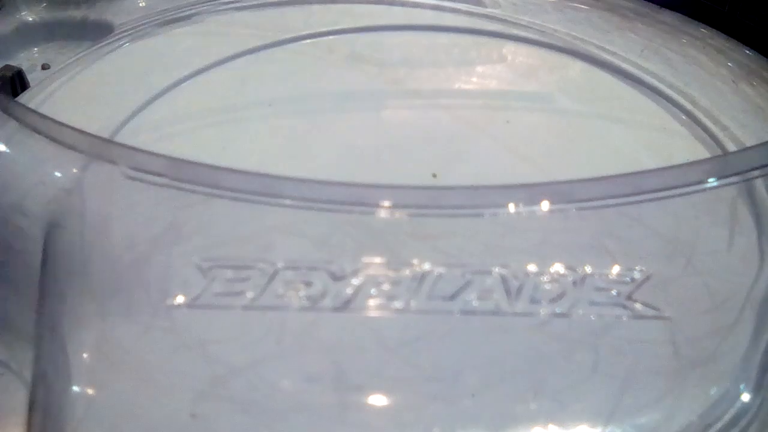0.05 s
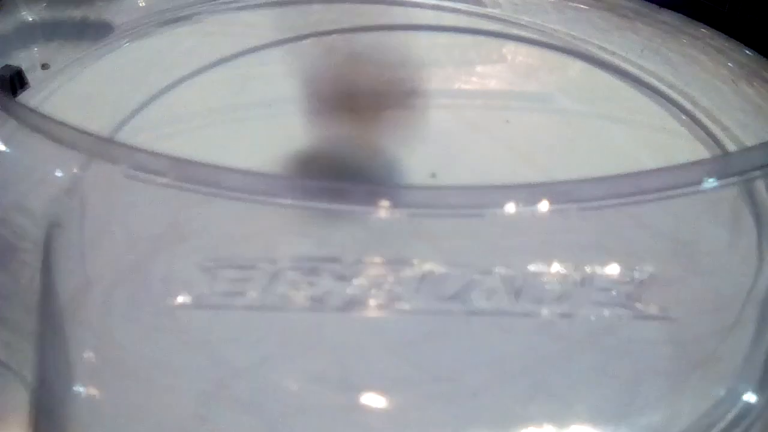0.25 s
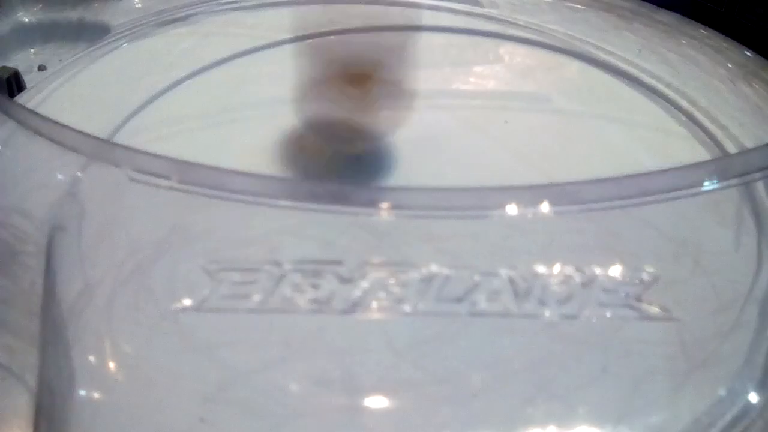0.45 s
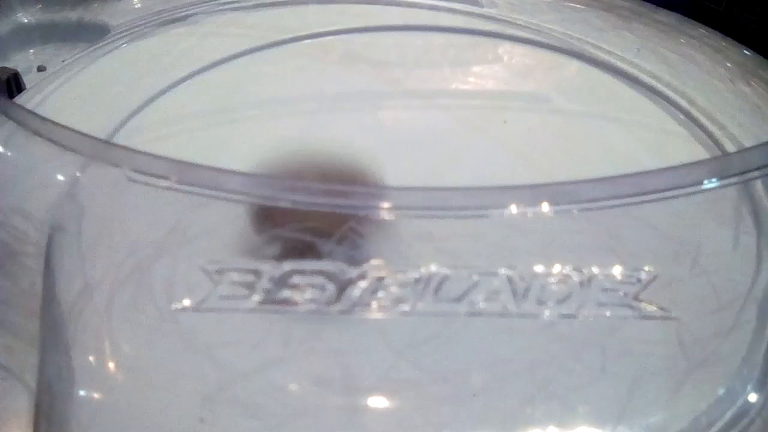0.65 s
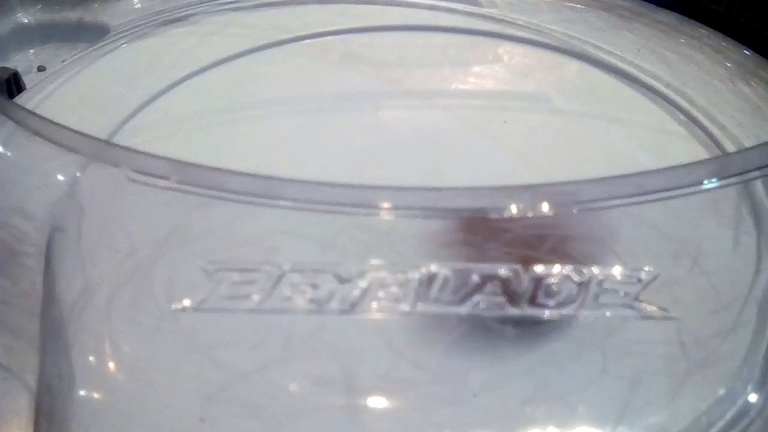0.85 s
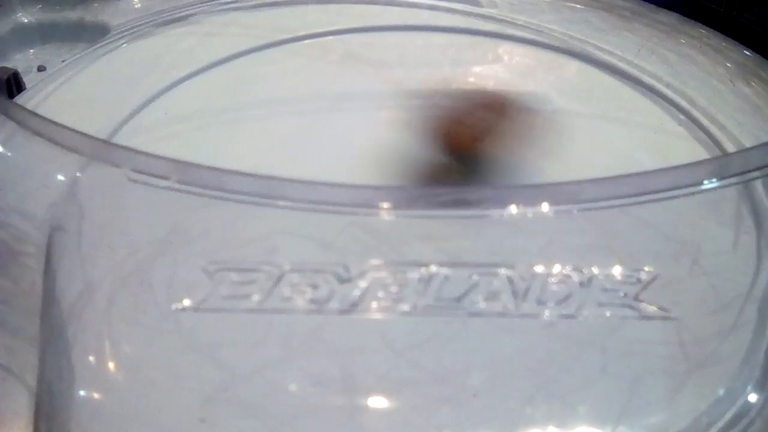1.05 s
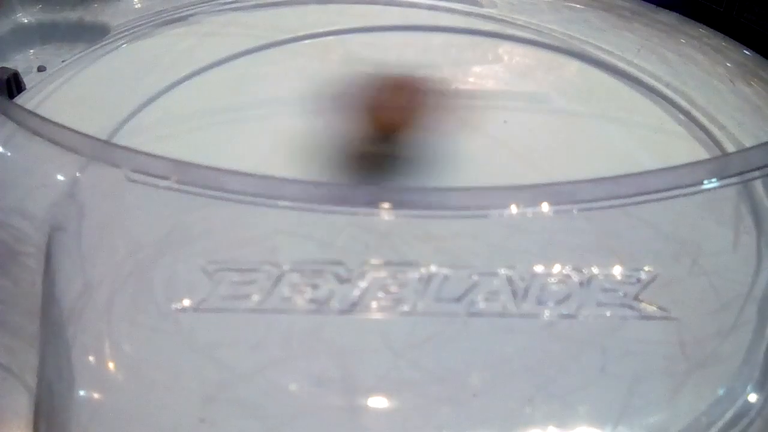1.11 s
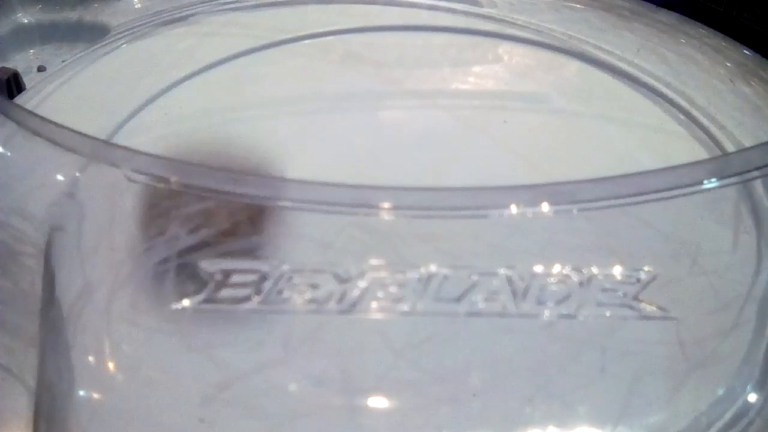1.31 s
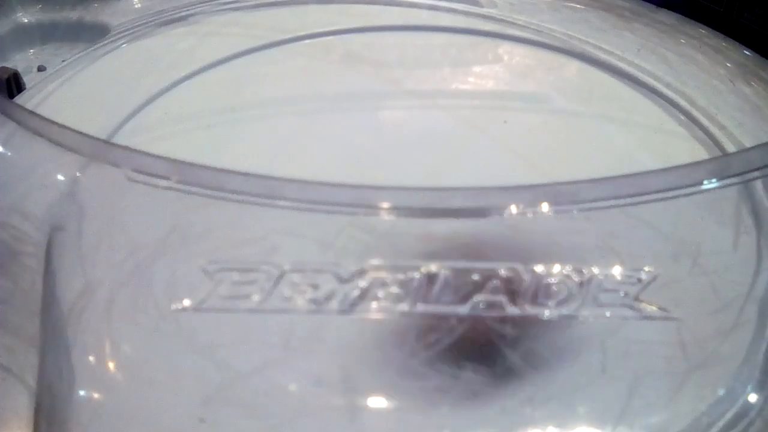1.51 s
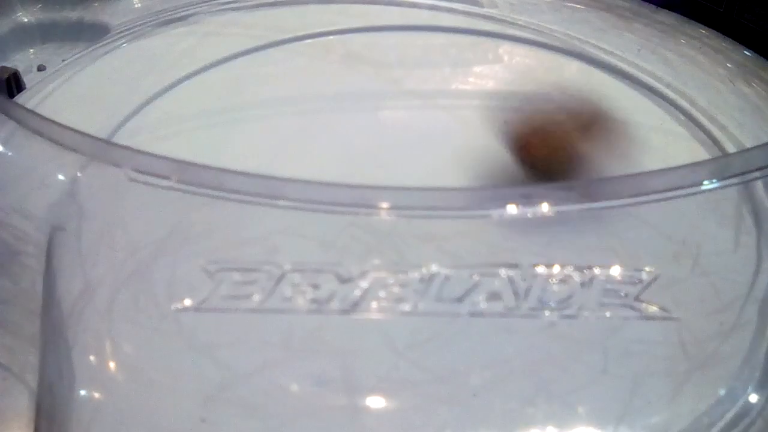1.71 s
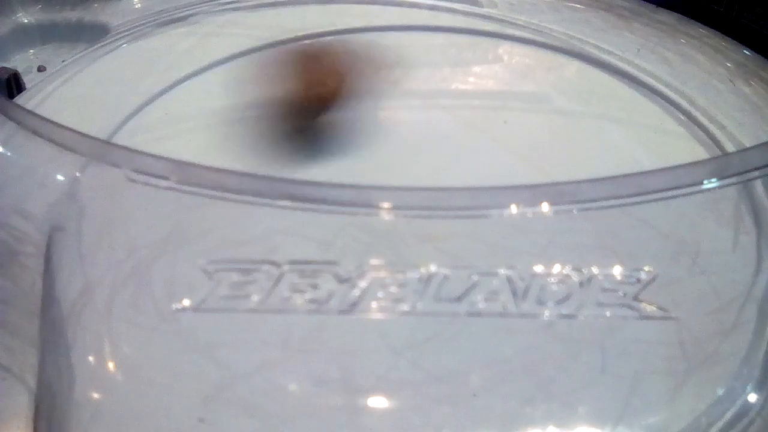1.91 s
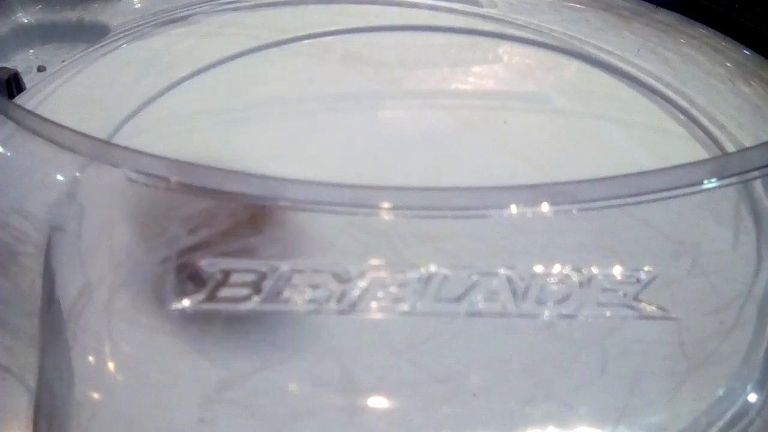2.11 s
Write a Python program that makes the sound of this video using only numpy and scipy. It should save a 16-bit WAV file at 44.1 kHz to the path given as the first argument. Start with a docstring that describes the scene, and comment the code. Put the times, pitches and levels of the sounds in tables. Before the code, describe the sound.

A toy spinning top is launched with a quick ratcheting zip at about 0.2 seconds. It lands in a plastic bowl with hollow thuds and ticks from 0.4 to 0.8 seconds. Then it circles with a low whir and faint rattle until the end, just past 2 seconds. Its rim clacks sharply against the wall around 0.9 seconds and rapidly from 1.3 to 1.7, close by in a small room.

```python
"""Spinning top in a plastic arena

A toy top is ripped from a ratchet launcher and drops into a thin plastic bowl in a small room.
It bounces and makes the floor boom, then circles: its uneven weight hums, its tip rumbles,
its loose parts tick once a turn, and its rim clacks against the wall."""
import sys
import numpy as np
from scipy import signal
from scipy.fft import rfft, irfft
from scipy.io import wavfile
from scipy.ndimage import uniform_filter1d

SR = 44100
rng = np.random.default_rng(int(sys.argv[2]) if len(sys.argv) > 2 else 0)


def put_to_file(sound):
    """Save the sound as 16-bit audio at rate SR, in the file named by the first command-line argument."""
    columns = np.atleast_2d(sound).T  # one column per channel
    safe = np.clip(columns, -1, 1)
    whole_steps = np.round(safe * 32767)
    wavfile.write(sys.argv[1], SR, whole_steps.astype(np.int16))


N = 94815
T = np.arange(N) / SR

# A "colour" says how strong each frequency is. A "tilt" makes a sound brighter (+) or duller (-).
# colour of the still air: (frequency [Hz], level [dB])
AIR_COLOUR = [(30, -6), (140, -4), (400, -14), (2000, -19), (16000, -19)]
# launcher teeth snapping past the catch: (time [s], level [dB], treble tilt [dB per octave])
TOOTH_SNAPS = [(0.1421, -36.5, 3.5), (0.1702, -35, 1.5), (.1840, -48, -2), (0.2004, -1.5, 2.5),
               (0.2136, -1.5, 2.5), (0.2267, -5.5, 3.5), (0.2356, -11, -2), (0.241, 3.5, 2),
               (0.2463, -8, 8.5), (0.2542, -7.5, -0.5), (.2620, -3, 8), (0.2705, -6.5, 1)]
# colour of the launcher: (frequency [Hz], level [dB])
LAUNCHER_COLOUR = [(40, -13.5), (150, -15.5), (500, -27), (1100, -21), (2000, -18), (2500, -7), (3300, -16),
                   (4100, -6.5), (4850, 1), (5600, -5.5), (7500, -9.5), (11000, -22.5), (16000, -41)]
# ringing tones of the launcher's shell: (frequency [Hz], level [dB], time to fade 60 dB [s])
SHELL_TONES = [(2425, -22.5, 0.084), (2770, -24, 0.087), (4160, -11, 0.021), (4880, -5.5, 0.02),
               (4807, -17, 0.025), (5440, -21, 0.018), (5370, -28, 0.019), (6160, -24, .045),
               (7600, -24, 0.11)]
# echo of the room: (frequency [Hz], level [dB], time to fade 60 dB [s])
ROOM_ECHO = [(60, -43, 0.38), (382, -23.5, 0.75), (1010, -17.5, 0.39), (2440, -6.5, 0.54),
             (4950, -19, 0.44), (7900, -13, 0.51), (12400, -15.5, 0.37), (16100, -23, 0.23)]
# the top hits the floor:
# (time [s], thud level [dB], tilt of the floor tones [dB per octave], tick level [dB], tip ring [Hz])
BOUNCES = [(0.4239, 1, 1, 2, 1820), (.4490, -7, 4, -7, 2350), (.474, -40, 9, -16, 2000),
           (.505, -14, 1.5, -19.5, 2000), (.6380, -4.5, -2.5, -6, 3640), (.644, -8, 1.5, -5.5, 5000),
           (.660, -20.5, 8, -14, 3530), (.7330, -29, -9.5, -18, 3500), (0.7409, -19, 8, -15.5, 3630),
           (.7737, -27, -1, -21, 4630)]
# ringing tones of the arena floor: (frequency [Hz], level [dB], time to fade 60 dB [s])
FLOOR_TONES = [(98.2, -24.5, 0.26), (147.2, -23, 0.14), (179, -32, .2), (294.5, -15.5, 0.21),
               (349.6, -14.5, 0.16), (389.3, -16.5, 0.2), (437.7, -24.5, 0.28), (550.4, -22.5, 0.13),
               (588.5, -17, 0.16), (698, -22.5, 0.18), (782, -22, 0.15), (939, -31.5, 0.15),
               (1130, -34, .12)]
# colour of the floor's many other, crowded tones: (frequency [Hz], level [dB])
FLOOR_COLOUR = [(30, -23), (70, -15), (140, -5.5), (350, 0.5), (490, -4.5), (620, 1), (1000, -9.5),
                (1350, -18), (1800, -25.5), (2600, -36), (6000, -47)]
# colour of the tip's tick: (frequency [Hz], level [dB])
TIP_COLOUR = [(200, -38), (1000, 8), (1800, 2), (2700, -4), (4700, 2.5), (7000, -2), (10000, -16),
              (16000, -29)]
# the top slows down: (time [s], speed [turns per second])
SPIN_SPEED = [(.45, 93), (1.03, 86), (1.23, 83.5), (1.55, 80.3), (1.8, 77.3), (1.97, 76.4), (2.15, 74.2)]
# hum of the uneven weight: (time [s], tone at spin speed [dB], tone at twice that [dB], wobble [dB])
HUM_LEVELS = [(.45, -58, -71, -59.5), (.88, -63, -57, -62.5), (1.03, -46.5, -56.5, -67),
              (1.2, -52, -51, -75), (1.45, -62, -48.5, -53), (1.65, -49.5, -53, -61.5),
              (1.82, -54.5, -54.5, -61), (1.98, -52.5, -53.5, -68), (2.15, -64, -54, -52)]
# extra tones of the wobble: (frequency [times the spin speed], level added to the wobble level [dB])
WOBBLE_TONES = [(1.5, 4.5), (2.5, 2.5), (3.5, 0.5), (4, -1.5), (4.5, 3), (5.5, 0), (8, -30)]
# how hard the tip grinds: (time [s], level [dB])
ROLL_LEVELS = [(.42, -103), (.5, -55.5), (.8, -43.5), (.9, -49.5), (1.12, -51.5), (1.3, -47.5), (1.49, -44),
               (1.6, -46), (1.8, -48.5), (1.98, -47), (2.06, -43.5), (2.15, -46.5)]
# colour of the rolling tip: (frequency [Hz], level [dB])
ROLL_COLOUR = [(25, -13), (55, -30), (100, 3), (170, -4), (230, -6), (350, -1), (490, -2.5), (590, -1.5),
               (800, -5.5), (1200, -7.5), (1700, -17), (3000, -24.5), (8000, -25), (16000, -72)]
# how much the loose parts rattle: (time [s], level [dB])
RATTLE_LEVELS = [(.45, -81), (.8, -65), (1.0, -45.5), (1.15, -49.5), (1.25, -47.5), (1.5, -50), (1.7, -47),
                 (1.86, -46.5), (1.92, -43.5), (2.05, -45), (2.15, -53.5)]
# colour of the rattle: (frequency [Hz], level [dB])
RATTLE_COLOUR = [(300, -15), (1500, -11), (2700, -17), (3700, -9), (4300, -2), (4800, -3), (5500, -9),
                 (7000, -9.5), (9000, -18), (12000, -27.5), (16000, -40)]
# ringing tones of the loose parts: (frequency [Hz], level [dB])
RATTLE_TONES = [(3750, -8), (4300, -23), (4880, -1)]
# the ticks limp, every second one stronger: (time [s], level of even turns over odd turns [dB])
TICK_LIMP = [(1.0, 14), (1.25, 8), (1.75, -6), (1.85, -8.5), (1.9, 3), (2.06, 8.5), (2.1, -18)]
# the rim hits the wall: (time [s], level [dB], low ring [Hz], its relative level [dB], high ring [Hz],
# its relative level [dB], treble tilt [dB per octave], time for the crack to fade 60 dB [s])
RIM_HITS = [(0.7167, -28.5, 3420, -30, 4770, -12, 2, 0.011), (0.8042, -18, 3600, -28, 6700, -20, 1.5, 0.03),
            (.844, -26.5, 3500, -30, 6770, -18, 1, 0.1), (0.86, -25.5, 3466, -25, 6460, -12, -2.5, 0.031),
            (.9190, 0, 3600, -15.5, 4630, -13, 0.5, 0.045),
            (1.0364, -11, 3620, -17.5, 4680, -20, -3, 0.048),
            (1.075, -15, 3800, -35, 4560, -12.5, -3.5, 0.13), (1.323, -1, 3284, -11, 8100, -12.5, 3, 0.025),
            (1.387, -2.5, 3365, -11.5, 7500, -13, 2.5, 0.021),
            (1.4482, -2.5, 2440, -15, 4840, -25, 1, 0.024), (1.5143, -4, 2480, -17, 4240, -15.5, 0, 0.018),
            (1.5625, -6, 2440, -19.5, 4000, -8.5, 0, 0.02),
            (1.6246, -3.5, 2600, -15, 3650, -14.5, 0, 0.019),
            (1.6884, -4, 2560, -10, 3840, -10.5, -3, 0.022)]
# colour of a hit on the wall: (frequency [Hz], level [dB])
WALL_COLOUR = [(100, -17), (1100, -36), (1800, -7.5), (2200, -3.5), (3000, -1), (4500, 0.5), (5600, 0),
               (7000, 0.5), (9000, -5.5), (10500, -18.5), (13000, -17.5), (16000, -25)]


def from_db(db):
    """Turn decibels into a number to multiply a sound by."""
    return 10 ** (np.asarray(db) / 20)


def over_time(table):
    """Join a table's rows with straight lines: one curve for each column after the time."""
    times, *columns = np.transpose(table)
    return [np.interp(T, times, column) for column in columns]


def at_hz(table, hz, column=1):
    """Look up a table at any frequency, giving every octave the same width."""
    rows = np.array(table)
    return np.interp(np.log(hz), np.log(rows[:, 0]), rows[:, column])


def add(out, start_s, sound):
    """Mix a sound in at its start time."""
    start = int(start_s * SR)
    out[start:] += sound[:N - start]


def noise(colour):
    """Steady noise of a given colour, with an average strength (rms) of 1."""
    hz = np.maximum(np.fft.rfftfreq(N, 1 / SR), 1)
    shaped = irfft(rfft(rng.standard_normal(N)) * from_db(at_hz(colour, hz)), N)
    return shaped / shaped.std()


def drift(per_second):
    """A curve that wanders at random, mostly between -1 and 1."""
    points = rng.standard_normal(400)
    return np.interp(T * per_second, np.arange(len(points)), points)


def burst(colour, fade_s, tilt_db=0):
    """Many close tones struck at once: noise that fades 60 dB in fade_s, with a total energy of 1."""
    size = 2 ** 15
    hz = np.maximum(np.fft.rfftfreq(size, 1 / SR), 1)
    fade = from_db(-60 * np.minimum(T[:size] / fade_s, 4))
    spectrum = rfft(rng.standard_normal(size) * fade)
    # even out the noise's chance humps, then colour it and tilt it above 2000 Hz
    humps = uniform_filter1d(np.abs(spectrum) ** 2, int(14 / fade_s * size / SR) + 1)
    gain = from_db(at_hz(colour, hz) + tilt_db * np.log2(np.maximum(hz, 2000))) / np.sqrt(humps)
    # this form of the filter lets nothing sound before the hit
    sharp_filter = np.exp(rfft(2 * irfft(np.log(gain))[:size // 2], size))
    hit = irfft(spectrum * sharp_filter)
    return np.pad(hit / np.sqrt(np.sum(hit ** 2)), (0, N - size))


def ring(hz, db, fade_s):
    """One struck tone that fades 60 dB in fade_s."""
    return from_db(db - 60 * np.minimum(T / fade_s, 4)) * np.sin(2 * np.pi * hz * T)


def strike(tones, spread_db):
    """A struck object rings with all its tones, each a little louder or softer at every blow."""
    return sum((-1) ** k * ring(hz, db + spread_db * rng.standard_normal(), fade_s)
               for k, (hz, db, fade_s) in enumerate(tones))


def still_air(level_db=-82):
    """The air in the room makes a very faint, steady rush."""
    return from_db(level_db) * noise(AIR_COLOUR)


def launcher(slide_s=(0.16, 0.2), slide_db=(-53.5, -27), snap_boost_db=18.5):
    """The cord slides and its teeth snap through the ratchet; each snap makes the shell ring."""
    sliding = (T > slide_s[0]) * (T < slide_s[1])
    cord = noise(LAUNCHER_COLOUR) * from_db(np.interp(T, slide_s, slide_db)) * sliding
    shell = np.zeros(N)
    for time, db, tilt_db in TOOTH_SNAPS:
        snap = burst(LAUNCHER_COLOUR, fade_s=0.027, tilt_db=tilt_db)
        add(cord, time, from_db(db + snap_boost_db) * snap)
        add(shell, time, from_db(db) * strike(SHELL_TONES, spread_db=4.5))
    return cord, shell


def room_echo(sound, delay_s=0.003, build_s=0.0067):
    """The room throws sound back as a smooth tail that fades at its own rate in each frequency band."""
    tail = np.zeros(N)
    edges_hz = np.geomspace(40, 18000, 10)
    onset = 1 - np.exp(-np.maximum(T - delay_s, 0) / build_s)
    for low, high in zip(edges_hz, edges_hz[1:]):
        hz = np.sqrt(low * high)
        band_filter = signal.butter(2, [low, high], "band", fs=SR, output="sos")
        band = signal.sosfilt(band_filter, rng.standard_normal(N))
        fade = onset * from_db(-60 * T / at_hz(ROOM_ECHO, hz, column=2))
        tail += from_db(at_hz(ROOM_ECHO, hz)) * band * fade / np.sqrt(np.sum(fade ** 2))
    return signal.fftconvolve(sound, tail)[:N]


def bounces(middle_hz=400, boom_boost_db=15, tick_boost_db=6.5):
    """The tip ticks on the floor and the thin bowl booms, brighter or duller with the spot it hits."""
    out = np.zeros(N)
    for time, thud_db, tilt_db, tick_db, tip_hz in BOUNCES:
        tones = [(hz, db + tilt_db * np.log2(hz / middle_hz), fade_s) for hz, db, fade_s in FLOOR_TONES]
        floor_ring = strike(tones, spread_db=0.5)
        boom = from_db(boom_boost_db) * burst(FLOOR_COLOUR, fade_s=0.16)
        tick = from_db(tick_db + tick_boost_db) * burst(TIP_COLOUR, fade_s=0.061)
        tip_ring = ring(tip_hz, tick_db - 19.5, fade_s=0.029)
        add(out, time, from_db(thud_db) * (floor_ring + boom) + tick + tip_ring)
    return out


def hum(turns, waver_db=2.0):
    """The top's uneven weight rocks the floor, making tones at multiples of the spin speed."""
    first_db, second_db, wobble_db = over_time(HUM_LEVELS)
    tones = [(1, first_db), (2, second_db)]
    for multiple, db in WOBBLE_TONES:
        tones.append((multiple, wobble_db + db + waver_db * drift(per_second=7.22)))
    return np.sqrt(2) * sum(from_db(db) * np.sin(2 * np.pi * (multiple * turns + rng.random()))
                            for multiple, db in tones)


def rolling(turns, throb_depth=0.081, lap_s=0.677, nearest_s=1.517, echo_gain=0.37):
    """The tip grinds round the bowl; its echo off the wall sweeps the colour once a lap."""
    level_db, = over_time(ROLL_LEVELS)
    throb = 1 + throb_depth * np.cos(2 * np.pi * turns)
    grind = from_db(level_db) * noise(ROLL_COLOUR) * throb
    # the echo comes latest when the top passes closest to the listener
    delay_s = 0.003286 + 0.00016 * np.cos(2 * np.pi * (T - nearest_s) / lap_s)
    wall_echo = echo_gain * np.interp(T - delay_s, T, grind)
    return (grind + wall_echo) / np.hypot(1, echo_gain)


def rattle(turns, speed, rise_s=0.0007, decay_s=0.0051, spread_db=1, steady_scuff=0.073):
    """Loose parts of the top tick once a turn: a short scuff and a ring, over a faint steady scuff."""
    level_db, = over_time(RATTLE_LEVELS)
    limp_db, = over_time(TICK_LIMP)
    turn = np.floor(turns).astype(int)
    since_tick_s = turns % 1 / speed
    strength = from_db(spread_db * rng.standard_normal(N)[turn] + limp_db * (0.5 - turn % 2))
    ticks = strength * np.exp(-since_tick_s / decay_s) * (1 - np.exp(-since_tick_s / rise_s))
    rings = sum(from_db(db) * np.sin(2 * np.pi * (hz * since_tick_s + rng.random(N)[turn]))
                for hz, db in RATTLE_TONES)
    scuff_shape = steady_scuff + ticks
    parts = noise(RATTLE_COLOUR) * scuff_shape + rings * ticks
    return from_db(level_db) * parts / np.sqrt(np.mean(scuff_shape ** 2))


def wall_ring(hz, db, fade_s, split=0.074, twin_db=-5):
    """A short, broad ring of the wall: one tone with a softer twin just above it."""
    return ring(hz, db, fade_s) - ring(hz * (1 + split), db + twin_db, fade_s)


def rim_clacks(crack_boost_db=5.5):
    """The rim hits the wall with a hard crack and a short ring whose pitch depends on the spot."""
    cracks, rings = np.zeros((2, N))
    for time, db, low_hz, low_db, high_hz, high_db, tilt_db, fade_s in RIM_HITS:
        add(cracks, time, from_db(db + crack_boost_db) * burst(WALL_COLOUR, fade_s, tilt_db))
        add(rings, time, wall_ring(low_hz, db + low_db, fade_s=0.022))
        add(rings, time, wall_ring(high_hz, db + high_db, fade_s=0.014))
    return cracks, rings


def scene(tick_at_s=1.171):
    """Launch, landing and spin, heard from beside the arena."""
    speed, = over_time(SPIN_SPEED)
    turns = np.cumsum(speed) / SR
    turns -= np.interp(tick_at_s, T, turns)   # a turn, and so a tick, starts at this moment
    landed = T > BOUNCES[0][0]
    cord, shell = launcher()
    cracks, wall_rings = rim_clacks()
    rings = shell + wall_rings
    clatter = bounces() + landed * rattle(turns, speed)
    # each sound reaches the room with its own strength; the whir stays free of room echo
    echo = room_echo(clatter + from_db(1) * cord + from_db(2) * cracks + from_db(-12.5) * rings)
    whir = landed * (hum(turns) + rolling(turns))
    return (cord + clatter + cracks + rings + whir + echo + still_air())[None]


def record(dry):
    """The loudest peaks are rounded off and the highest treble is cut."""
    ceiling, stop_hz = 0.72, 16800
    rounded = ceiling * np.tanh(dry / ceiling)
    return signal.sosfilt(signal.cheby2(14, 60, stop_hz, fs=SR, output="sos"), rounded)


dry = scene()
out = record(dry)
put_to_file(out)
```